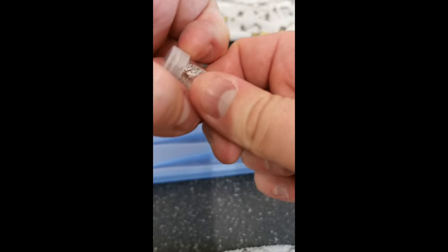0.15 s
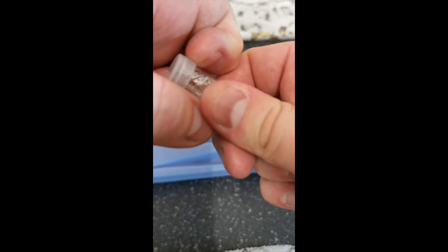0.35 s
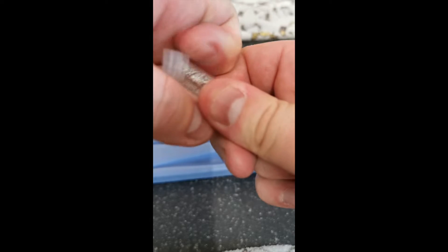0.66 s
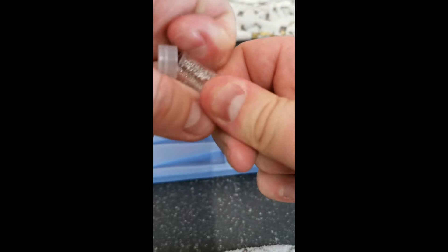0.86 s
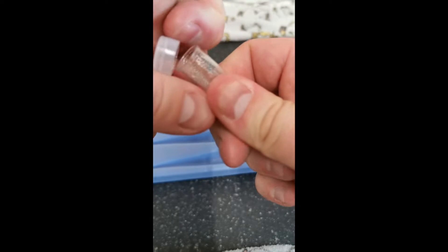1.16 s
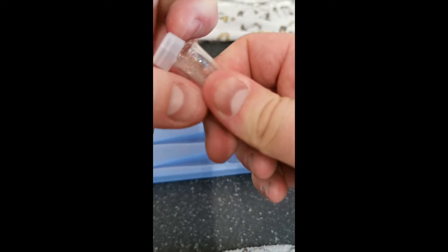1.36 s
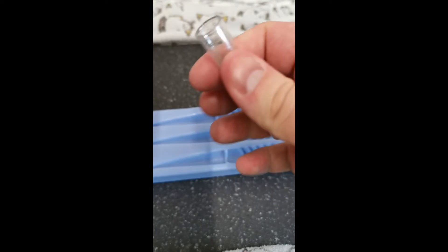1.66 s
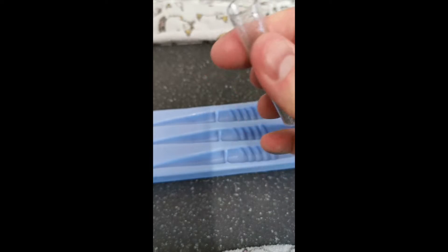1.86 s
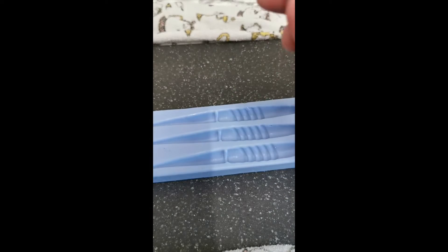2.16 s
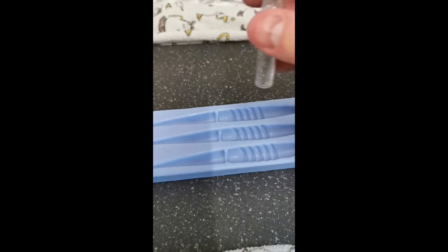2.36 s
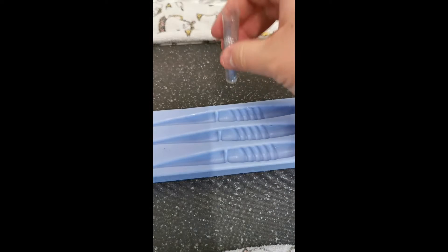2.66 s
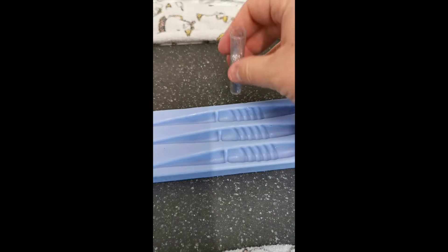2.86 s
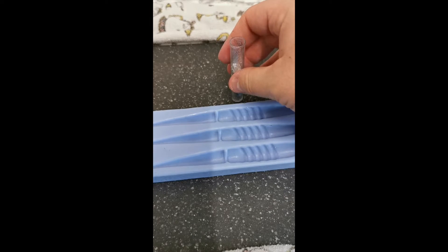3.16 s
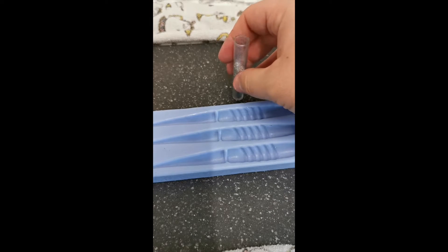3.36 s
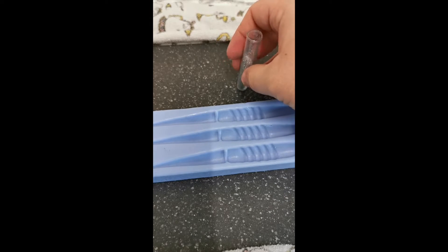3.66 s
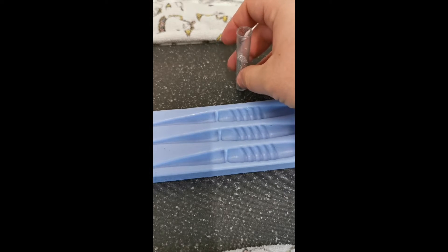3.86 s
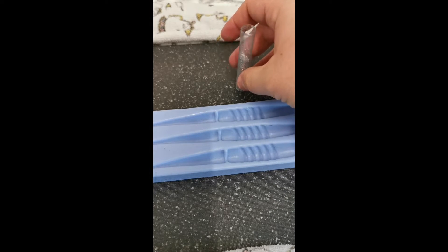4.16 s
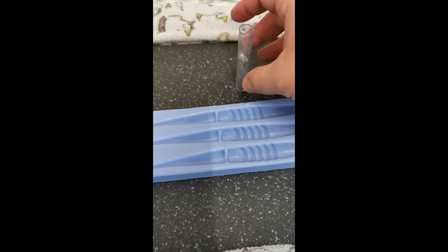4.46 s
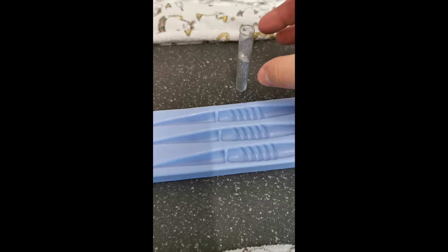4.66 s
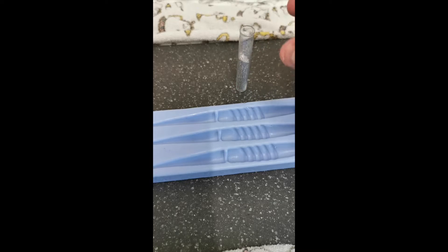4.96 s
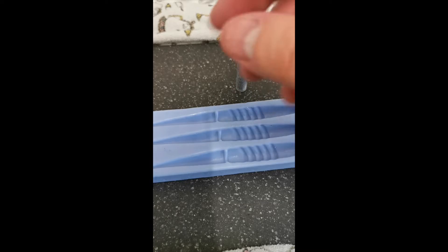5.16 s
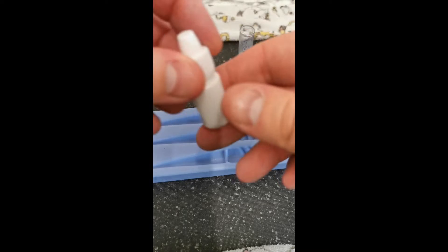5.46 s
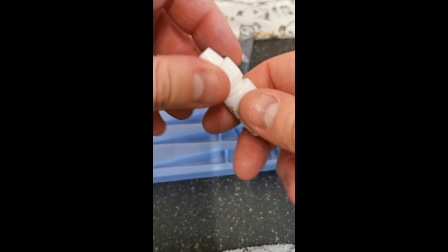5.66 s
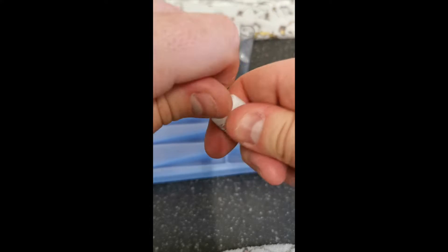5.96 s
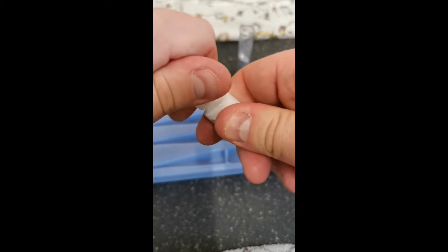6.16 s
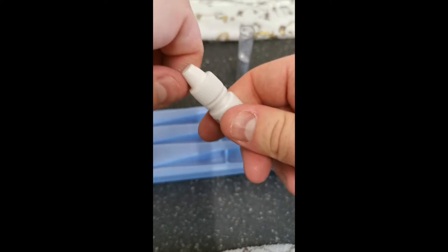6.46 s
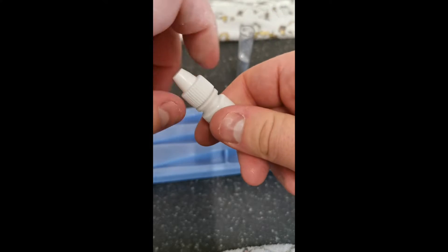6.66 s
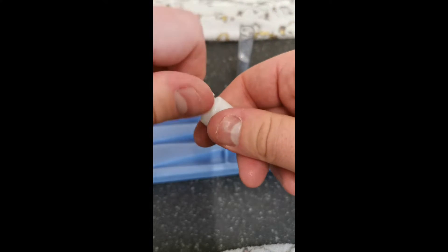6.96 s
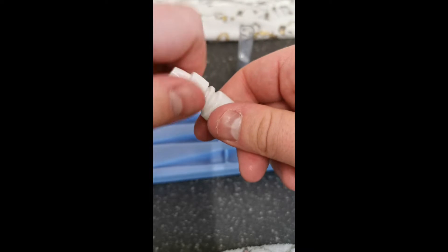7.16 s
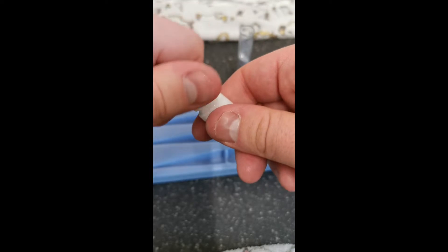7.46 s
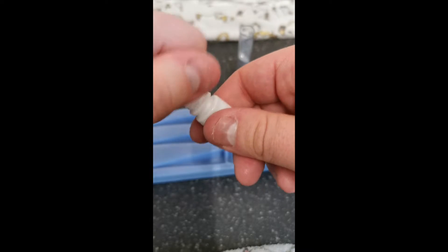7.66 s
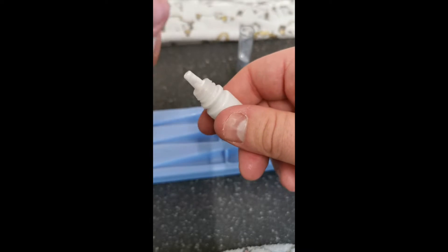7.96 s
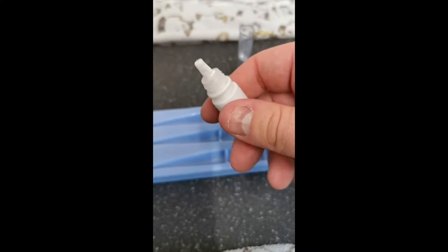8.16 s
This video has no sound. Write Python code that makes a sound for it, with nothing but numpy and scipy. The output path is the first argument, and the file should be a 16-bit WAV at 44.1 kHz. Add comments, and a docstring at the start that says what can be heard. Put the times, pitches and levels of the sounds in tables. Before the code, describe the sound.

Over the steady hum and fan noise of a kitchen microwave oven, a small plastic tube is uncapped close by with a loud snap and a pop. A faint knock follows, the tube taps down on the counter, and another dull knock comes from farther off. A dropper bottle's cap then twists open with scratchy clicks. The handling sounds are bright, near the microphone and toward the left, with a brief room echo.

```python
"""A microwave oven runs in a kitchen: transformer hum, the tones of a cooling fan and its rush of air.
Close to a phone, fingers rub a small plastic tube and prise its cap off (a snap, then a pop of air).
The tube lands on the counter between two dull, distant knocks; a dropper bottle is unscrewed in
stick-slip ticks, with one thin squeak. Each hit rings the modes of its object and the room briefly;
the phone's gain control ducks after the loudest peaks."""
import sys
import numpy as np
from scipy import signal
from scipy.fft import rfft, irfft
from scipy.io import wavfile

SR = 44100
rng = np.random.default_rng(int(sys.argv[2]) if len(sys.argv) > 2 else 0)


def inscribe(sig):
    """Save sig as 16-bit PCM at rate SR to the path in sys.argv[1].

    A 1-D sig is mono; a 2-D sig holds one channel per row.
    Samples are clipped to [-1, 1] before scaling.
    """
    pcm = np.round(np.clip(np.atleast_2d(sig).T, -1, 1) * 32767)
    wavfile.write(sys.argv[1], SR, pcm.astype(np.int16))


N = 366471
T = np.arange(N) / SR
FREQS = np.maximum(np.fft.rfftfreq(N, 1 / SR), 1)

# modes of the plastic tube (frequency [Hz], width [Hz], level [dB])
TUBE_MODES = [(1960, 900, -29), (4680, 2200, -7.5), (5980, 1200, -10), (8370, 740, -6.5),
              (9250, 1320, -3.5), (10550, 1200, -6.5), (13400, 2730, -39.5)]


def undb(db):
    """Decibels to gain."""
    return 10 ** (np.asarray(db) / 20)


def spectrum(rows, hz):
    """One curve for each value column of a frequency table, interpolated on a log axis."""
    points, *columns = np.transpose(rows)
    return np.array([np.interp(np.log(hz), np.log(points), column) for column in columns])


def colour(x, db):
    """Minimum-phase EQ with the given gain at each of FREQS."""
    cepstrum = irfft(np.log(undb(db)), N)
    cepstrum[..., 1:N // 2] *= 2
    cepstrum[..., N // 2:] = 0
    return irfft(rfft(x, N) * np.exp(rfft(cepstrum)), N)


def walk(rate_hz):
    """Smooth random modulation with a spread of one, rolling off above rate_hz."""
    x = irfft(rfft(rng.standard_normal(N)) * np.exp(-(FREQS / rate_hz) ** 2), N)
    return x / x.std()


def place(at_s, x, send_db):
    """One event on the timeline, as (direct sound, room send)."""
    track = np.zeros(N)
    start = int(at_s * SR)
    track[start:start + len(x)] = x[:N - start]
    return np.outer([1, undb(send_db)], track)


def port_correlation(hz):
    """The oven's stereo image: the two microphone ports share the bass but not the treble."""
    # likeness of the ports (frequency [Hz], correlation [-1 to 1])
    likeness = [(30, 1), (55, 0.84), (140, 0.98), (230, 1), (400, 0.78), (600, 0.51), (850, -0.17),
                (1130, -0.66), (1500, -0.073), (1900, 0.14), (3000, -.1), (5000, -0.061)]
    return np.clip(spectrum(likeness, hz)[0], -1, 1)


def tone(hz, left_db, right_db, drift):
    """One stereo hum line; the less the ports correlate, the further apart its phases lie."""
    phase = 2 * np.pi * hz * T + rng.uniform(0, 2 * np.pi) + drift
    apart = np.arccos(port_correlation(hz))
    return np.sqrt(2) * np.array([undb(left_db) * np.sin(phase - apart), undb(right_db) * np.sin(phase)])


def transformer(mains_hz=49.966, turn_s=8.75):
    """Mains harmonics; two of them swell and fade as the turntable carries the load round."""
    # hum lines (mains multiple [rounded on use], left level [dB], right level [dB])
    harmonics = [(1, -71.5, -61), (2, -73, -64), (4.01, -60, -51.5), (5, -69, -64), (6, -60, -55.5),
                 (8, -67, -61.5), (12, -73, -69), (19.85, -85, -82), (28.1, -79.5, -95.5)]
    # lines that fade once a turn (mains multiple, weakest at [s], depth [0-1])
    fades = [(6, 5.4, 0.42), (8, 8.4, 0.32)]
    drift = .03 * walk(0.64)
    swell = {k: np.abs(1 - depth * np.exp(2j * np.pi * (T - s) / turn_s)) for k, s, depth in fades}
    hum = 0
    for multiple, left_db, right_db in harmonics:
        k = round(multiple)
        hum = hum + tone(k * mains_hz, left_db, right_db, k * drift) * swell.get(k, 1)
    return hum


def fan(blade_hz=174.17, flutter_db=1.27, swell_db=1.03):
    """Blade tones on a slightly unsteady shaft swell together; the overtones flutter in turbulence."""
    # fan tones (blade-rate multiple, left level [dB], right level [dB])
    harmonics = [(1, -53.5, -52), (2, -65.5, -57.5), (3, -66.5, -83.5), (4, -77.5, -67), (5, -77, -68.5),
                 (6, -69, -81.5)]
    drift = 0.23 * walk(1.6)
    tones = 0
    for k, left_db, right_db in harmonics:
        line = tone(k * blade_hz, left_db, right_db, k * drift)
        flutter = undb(flutter_db * min(k - .5, 2) * walk(2.5))
        tones = tones + line * flutter
    return tones * undb(swell_db * walk(1.5))


def air_rush(waver_db=.5, ripple_db=2.5, ripple_step_hz=22):
    """Fan air through the casing; standing waves in the kitchen ripple its spectrum above 500 Hz."""
    # noise bed (frequency [Hz], left density [dB/Hz], right density [dB/Hz])
    bed = [(22.2, -81, -85), (78.8, -95.5, -93), (119.2, -83.5, -81), (178.7, -79, -77),
           (270.3, -87.5, -86), (320.5, -84, -76), (462.6, -88, -85.5), (703, -91, -81),
           (1028, -91.5, -85.5), (1253, -95.5, -99), (2460, -100, -98), (4100, -109, -109),
           (6410, -116, -114), (10010, -121, -119), (15500, -121, -119)]
    # hollow resonances of the casing (frequency [Hz], width [Hz], left gain [dB], right gain [dB])
    casing = [(120.6, 7.8, 5.5, 8.5), (344.4, 4.5, 4, 5), (1897, 198, 2, 9), (2580, 150, 2, 5),
              (1500, 77, -1.5, -2.5)]
    db = spectrum(bed, FREQS)
    for hz, width, left_db, right_db in casing:
        db = db + np.outer([left_db, right_db], np.exp(-((FREQS - hz) / width) ** 2))
    bumps = rng.standard_normal((2, 1500))
    ripple = np.array([np.interp(FREQS / ripple_step_hz, np.arange(len(row)), row) for row in bumps])
    db = db + ripple_db * ripple * np.clip(FREQS / 500 - 1, 0, 1)
    alike = port_correlation(FREQS)
    mid, side = rfft(rng.standard_normal((2, N))) * np.sqrt([1 + alike, 1 - alike])
    rush = irfft(np.array([mid + side, mid - side]) * undb(db), N) * np.sqrt(SR) / 2
    return rush * undb(waver_db * walk(5.4))


def finger_rubs(grain_db=3):
    """Skin sliding on plastic gives a faint grainy hiss."""
    # strokes (centre time [s], level [dB], half length [s])
    rubs = [(0.231, -69, 0.014), (0.26, -71.5, 0.16), (2.728, -68.5, 0.036), (5.55, -79, 0.83),
            (8.288, -74.5, .03)]
    # tone of the friction (frequency [Hz], gain [dB])
    rub_eq = [(1500, -18), (3000, -2), (7000, -4), (10000, -4), (15500, -5.5)]
    pressure = sum(undb(db) * np.exp(-((T - s) / half_s) ** 2) for s, db, half_s in rubs)
    grains = rng.standard_normal(N) * undb(grain_db * walk(150))
    hiss = colour(grains, spectrum(rub_eq, FREQS)[0])
    return place(0, pressure * hiss / hiss.std(), send_db=-9)


def hit(modes, db, contact_s, grit, tilt_db=0, size=4096):
    """A sharp release and micro-slips dying over contact_s ring an object's modes; tilt is per octave."""
    t = T[:size]
    ring = 0
    for k, (hz, width, mode_db) in enumerate(modes):
        gain = (-1) ** k * undb(mode_db + tilt_db * np.log2(hz))
        ring = ring + gain * np.exp(-np.pi * width * t) * np.sin(2 * np.pi * hz * t)
    # small things radiate poorly below their lowest mode
    low_cut = signal.butter(2, 0.73 * modes[0][0], "high", fs=SR, output="sos")
    ring = signal.sosfilt(low_cut, ring)
    fade = np.exp(-t / contact_s)
    slips = signal.fftconvolve(rng.standard_normal(size) * fade, ring)[:size]
    slips *= grit * np.sqrt(np.sum(fade ** 2) * np.sum(ring ** 2) / np.sum(slips ** 2))
    slips = np.roll(slips, int(.0003 * SR))  # a moment after the release
    return undb(db) * (ring + slips) / np.abs(ring).max()


def uncap_tube(rim_width_hz=2600):
    """The cap snaps over its rim and jolts the hands; as the seal breaks, the air in the tube pops."""
    # the cap gives way (time [s], snap level [dB], rim ring [Hz], rim mode level [dB],
    # pop level [dB], jolt level [dB], room send [dB])
    snaps = [(0.7589, -10.5, 9210, -27, -43, -46.5, -13.5), (0.9433, -14.5, 13100, 4.5, -15.5, -62, -15)]
    # modes of the cap, the air column and the hands (frequency [Hz], width [Hz], level [dB])
    cap_modes = [(1405, 460, -26), (2010, 420, -20), (3700, 970, -10), (5050, 930, -7), (6730, 1500, -3.5),
                 (8850, 1000, -4), (10700, 1600, -6), (13530, 2635, -11)]
    air_modes = [(1820, 225, -1.5), (2627, 200, -10), (3640, 1100, -4), (5310, 1300, -5.5)]
    hand_modes = [(49.9, 36, 0), (115, 70, -2)]
    out = 0
    for s, snap_db, rim_hz, rim_db, pop_db, jolt_db, send_db in snaps:
        snap = hit(cap_modes + [(rim_hz, rim_width_hz, rim_db)], snap_db, contact_s=0.00313, grit=0.077)
        pop = hit(air_modes, pop_db, contact_s=0.00092, grit=0.0077)
        jolt = hit(hand_modes, jolt_db, contact_s=0.0019, grit=0.01016)
        out = out + place(s, snap + jolt, send_db) + place(s, pop, send_db - 4)
    return out


def distant_knocks(contact_s=.0012):
    """Dull knocks, heard largely through the room, each with a very faint plastic tick."""
    # knocks (time [s], level [dB], tilt [dB/octave])
    knocks = [(3.0039, -46.5, 1), (3.6581, -29.5, -3)]
    # modes of the thud (frequency [Hz], width [Hz], level [dB])
    thud_modes = [(587, 130, -2), (814, 154, 3.5), (957, 110, -0.5), (1350, 400, -6.5), (1880, 140, -4.5),
                  (2400, 520, -5), (3300, 790, -9)]
    out = 0
    for s, db, tilt_db in knocks:
        thud = hit(thud_modes, db, contact_s, grit=0.011, tilt_db=tilt_db)
        tick = hit(TUBE_MODES, db - 58, contact_s, grit=.12)
        out = out + place(s, thud + tick, send_db=-2)
    return out


def stand_tube(land_s=3.0943, gap_s=.0527, gap_shrink=.635, grit=0.15):
    """The tube's edge grazes the counter, its foot lands, and it rocks in two ever shorter bounces."""
    landing = hit(TUBE_MODES, db=-17.5, contact_s=.0027, grit=grit, tilt_db=3.5)
    out = place(land_s, landing, send_db=-8.5)
    # lighter, duller touches (time [s], level [dB])
    graze = (land_s - .006, -28)
    bounces = [(land_s + gap_s, -35.5), (land_s + gap_s * (1 + gap_shrink), -39)]
    for s, db in [graze, *bounces]:
        touch = hit(TUBE_MODES, db, contact_s=0.0026, grit=grit, tilt_db=-4)
        out = out + place(s, touch, send_db=-15.5)
    return out


def twist_ticks(from_s=6.0, to_s=7.7, db=-60.5, scatter_db=4.0, ring_hz=11500, length_s=.002, count=9):
    """Tiny slips at random moments while the bottle's cap turns, as rows for unscrew_bottle."""
    return [(from_s + when * (to_s - from_s), db + scatter_db * (2 * force - 1), ring_hz, length_s)
            for when, force in rng.random((count, 2))]


def unscrew_bottle(catch_s=.0061, thread_width_hz=1200, thread_db=0.5, dulling_db=5):
    """The thread sticks and slips; a long slip catches again and again, each time with less ring."""
    # slips of the cap (time [s], level [dB], thread ring [Hz], length [s])
    slips = [(5.994, -51, 11400, 0.0053), (6.0479, -41.5, 9150, 0.0064), (6.0525, -30, 11000, .004),
             (6.16, -31.5, 12460, 0.014), (6.503, -59, 11500, .003), (7.7065, -35, 10600, 0.0013),
             (7.7312, -48, 13500, .001), (7.7413, -43, 14300, .001), (7.754, -42.5, 12100, .002),
             (7.8737, -47, 10600, .0007), (7.8904, -34, 10600, .0005)]
    # modes of the bottle (frequency [Hz], width [Hz], level [dB])
    bottle_modes = [(1890, 270, -13), (2450, 540, -4.5), (3360, 1460, -1), (5400, 1100, -11),
                    (8900, 1500, -15.5), (11000, 4300, -24.5)]
    out = 0
    for s, db, ring_hz, length_s in slips + twist_ticks():
        for k in range(3):
            thread_mode = (ring_hz, thread_width_hz, thread_db - dulling_db * k)
            catch = hit(bottle_modes + [thread_mode], db, contact_s=min(length_s, catch_s), grit=0.18)
            fade = np.exp(-(k * catch_s / length_s) ** 2)
            out = out + place(s + k * catch_s, catch * fade, send_db=-16.5)
    return out


def finger_squeak(centre_s=7.325, half_s=.075, top_s=7.31, top_hz=11500, sag_hz=1400, db=-89):
    """A fingertip squeaks on the bottle: a thin, jittery whistle whose pitch rises and falls."""
    swell = np.sqrt(np.clip(1 - ((T - centre_s) / half_s) ** 2, 0, 1))
    arch_hz = top_hz - sag_hz * ((T - top_s) / half_s) ** 2
    hz = arch_hz * (1 + 0.0044 * walk(200))
    phase = 2 * np.pi * np.cumsum(hz * (swell > 0)) / SR
    return np.sqrt(2) * np.sin(phase) * undb(db) * swell


def kitchen_reverb(send, predelay_s=0.0057, build_s=0.0052, left_db=1.5, right_db=4.5, size=22050):
    """The kitchen's short tail builds up after the first wall and lasts longest in the mids and highs."""
    # the tail by band (frequency [Hz], t60 [s], relative level [dB])
    bands = [(700, 0.19, 4.5), (1367, 0.32, 5.5), (2508, 0.29, 4.5), (6006, 0.35, -2.5), (9500, 0.32, -0.5),
             (14820, 0.2, 1.5)]
    hz, s, cells = signal.stft(rng.standard_normal((2, size)), SR, nperseg=256)
    t60, db = spectrum(bands, np.maximum(hz, 1))[:, :, None]
    decay = np.exp(-np.log(1000) * s / t60)
    tail = signal.istft(cells * undb(db) * decay, SR)[1][:, :size]
    tail *= np.clip((T[:size] - predelay_s) / build_s, 0, 1)
    tail /= np.sqrt(np.sum(tail ** 2, axis=1, keepdims=True))
    return signal.fftconvolve(send[None], tail, axes=1)[:, :N] * undb([[left_db], [right_db]])


def scene():
    """The oven fills the room; the hands work close to the left port and reach the right one later."""
    # the phone's body shades the right port from the hands (frequency [Hz], gain [dB])
    shade = [(1200, 2), (1900, 5), (2700, -5), (4200, -24), (7000, -13), (10000, -25.5), (15000, -18)]
    oven = transformer() + fan() + air_rush()
    near, near_send = uncap_tube() + stand_tube() + unscrew_bottle() + finger_rubs()
    near = near + finger_squeak()  # too thin to wake the room
    far, far_send = distant_knocks()
    shaded = np.roll(colour(near, spectrum(shade, FREQS)[0]), int(.0004 * SR))
    return oven + np.array([near, shaded]) + far + kitchen_reverb(near_send + far_send)


def gain_control(x, threshold_db=-13, depth_db=6.5, attack_s=0.0069, makeup_db=2.0,
                 quick_db_per_s=14, slow_db_per_s=0.03, slow_share=0.31):
    """A loud peak ducks the gain; most of it returns quickly, the rest creeps back."""
    peak_db = 20 * np.log10(np.abs(x).max(axis=0) + 1e-9)
    over_db = np.clip(peak_db - threshold_db, 0, depth_db)
    quick = np.maximum.accumulate(over_db + quick_db_per_s * T) - quick_db_per_s * T
    slow = np.maximum.accumulate(slow_share * over_db + slow_db_per_s * T) - slow_db_per_s * T
    step = 1 / (attack_s * SR)
    duck_db = signal.lfilter([step], [1, step - 1], np.maximum(quick, slow))
    return x * undb(makeup_db - duck_db)


def record(dry, top_hz=15900):
    """The phone's chain: port resonances, gain control and a steep top cut."""
    # colour of the microphone ports (frequency [Hz], left gain [dB], right gain [dB])
    port_eq = [(5998, 0, -0.5), (7630, -2, 2), (8930, 11.5, -15.5), (9770, 8, -12), (10780, 10.5, -11),
               (12450, 6, -10), (14130, 4.5, -4.5), (15440, 5.5, -1)]
    ducked = gain_control(colour(dry, spectrum(port_eq, FREQS)))
    top_cut = signal.ellip(10, .2, 70, top_hz, fs=SR, output="sos")
    return signal.sosfilt(top_cut, ducked)


dry = scene()
out = record(dry)
inscribe(out)
```